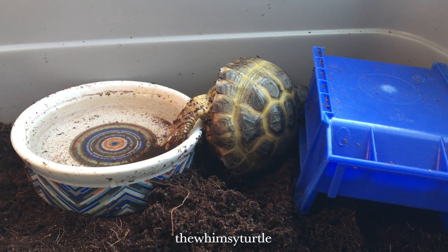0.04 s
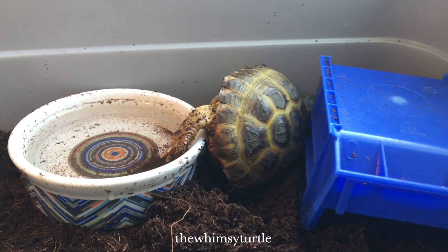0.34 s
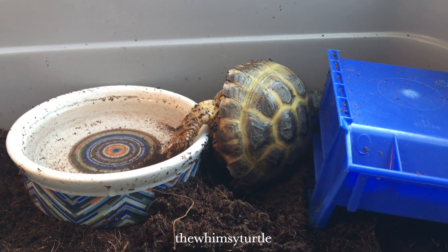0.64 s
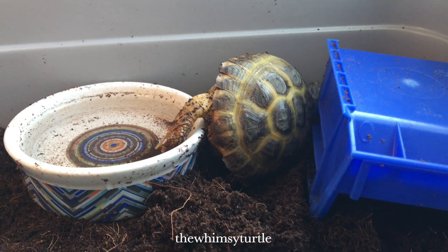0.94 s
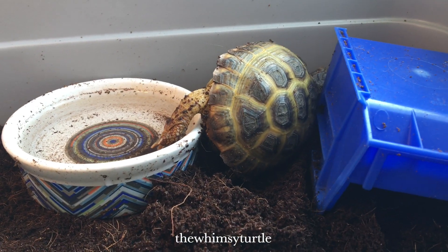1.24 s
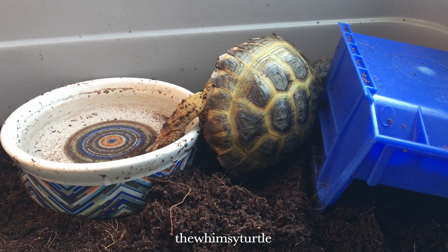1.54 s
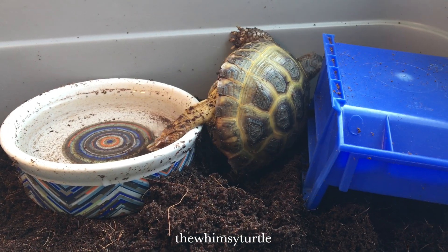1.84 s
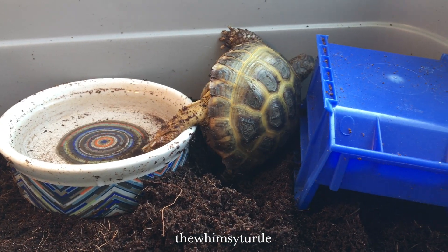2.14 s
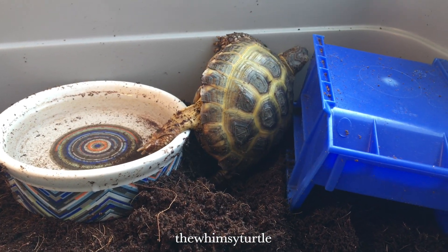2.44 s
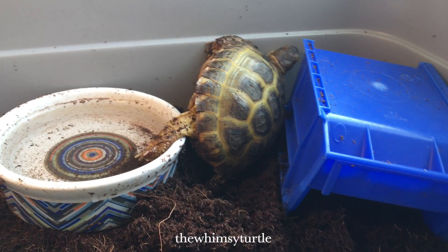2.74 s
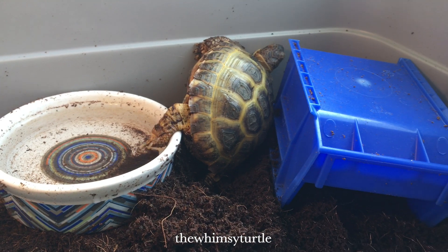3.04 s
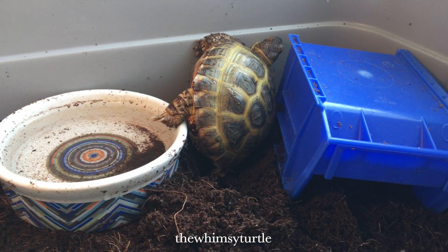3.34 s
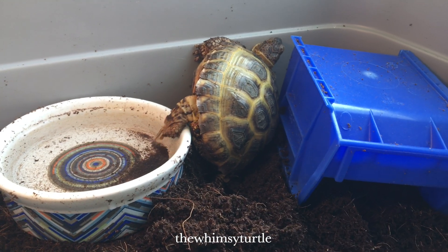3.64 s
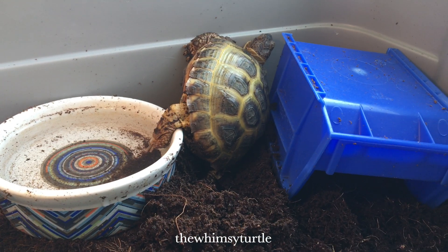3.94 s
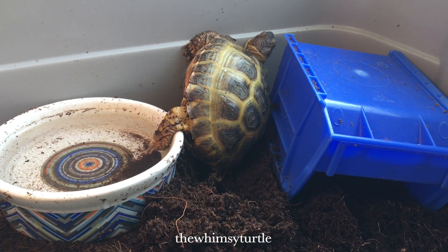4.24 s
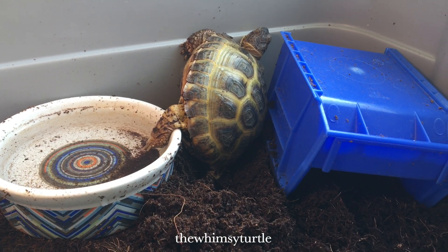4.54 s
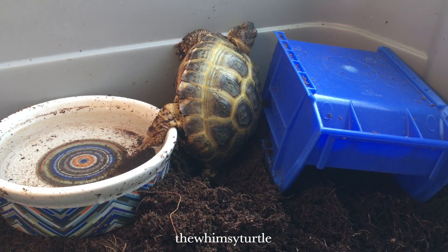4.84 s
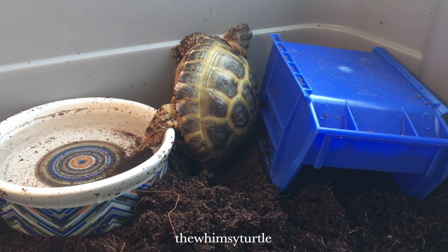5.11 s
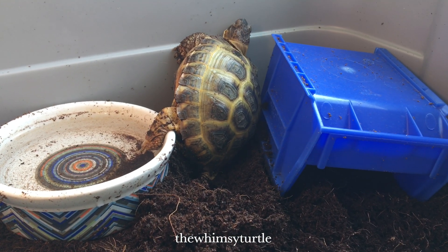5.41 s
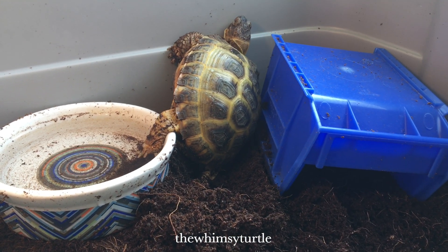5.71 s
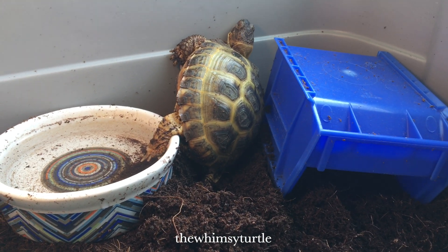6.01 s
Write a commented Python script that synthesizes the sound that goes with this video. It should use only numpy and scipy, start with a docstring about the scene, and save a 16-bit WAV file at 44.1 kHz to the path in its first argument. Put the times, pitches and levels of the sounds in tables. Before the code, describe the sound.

Close up, over faint indoor hum and hiss, soft claw scratches and gritty ticks come from a tortoise in a soil-filled plastic tub. Early on it slips, and the tub gives one loud, clattering thump. The animal keeps pushing in uneven bursts, its shell sticking and sliding so the plastic creaks and groans between light bumps. Near the end the rubbing grows stronger, with several hollow knocks close together.

```python
"""In a quiet room, a tortoise climbs the wall of a plastic tub, wedged between a bowl and a plastic hide.
An appliance hums faintly. Dry soil rustles and ticks under the feet, and the claws scratch and tap.
The shell sticks and slips along the plastic, which makes the tub judder and groan.
Once the tortoise slips and drops against the tub, which booms."""
import sys
import numpy as np
from scipy import signal
from scipy.fft import rfft, irfft
from scipy.io import wavfile
from scipy.ndimage import uniform_filter1d

SR = 44100
rng = np.random.default_rng(int(sys.argv[2]) if len(sys.argv) > 2 else 0)


def store_wav(level_fs):
    """Save 16-bit WAV to argv[1]."""
    pcm = np.round(np.clip(np.atleast_2d(level_fs), -1, 1) * 32767)
    wavfile.write(sys.argv[1], SR, pcm.T.astype(np.int16))


N = 267687
TIME = np.arange(N) / SR


def amp(db):
    """Turns decibels into a number to multiply by."""
    return 10 ** (np.asarray(db) / 20)


def unit(x):
    """Makes the average strength (rms) 1."""
    return x / np.sqrt(np.mean(x ** 2) + 1e-20)


def peaked(x):
    """Makes the highest peak 1."""
    return x / (abs(x).max() + 1e-20)


def steady(x, size=2600):
    """Evens out the loudness over about `size` samples but keeps the fine grain."""
    power = uniform_filter1d(uniform_filter1d(x ** 2, size), size)
    return x / np.sqrt(abs(power) + 1e-20)


def look_up(points, hz):
    """Reads between the rows of a table of frequencies."""
    f, value = np.transpose(points)
    return np.interp(np.log(hz + 1), np.log(f + 1), value)


def colour(x, points):
    """Sets the bass and treble from a table; sound below its first row fades away."""
    hz = np.fft.rfftfreq(2 * N, 1 / SR)
    bass_fade = np.minimum(hz / points[0][0], 1) ** 2
    return irfft(rfft(x, 2 * N) * amp(look_up(points, hz)) * bass_fade)[:N]


def keep(x, hz, side, order=2):
    """Keeps the "low" or "high" side of hz; a higher order cuts more sharply."""
    return signal.sosfilt(signal.butter(order, hz, side, fs=SR, output="sos"), x)


def add(mix, s, sound):
    """Mixes a sound in at s seconds."""
    part = mix[max(round(s * SR), 0):][:len(sound)]
    part += sound[:len(part)]


def grains(per_s, spread_db):
    """Tiny random hits, most small and a few large."""
    chance, size, sign = rng.random(N), rng.exponential(1, N), rng.choice([-1, 1], N)
    return (chance < per_s / SR) * sign * amp(spread_db * np.minimum(size, 4))


def clumps(depth_db, hz):
    """A sliding foot grips unevenly, so the loudness wanders."""
    return amp(depth_db * unit(keep(rng.standard_normal(N), hz, "low")))


def loudness(moves, start_db, end_db, grip_s, release_s, columns=(3,), power=1, lag=0):
    """Each move grips, swells to the sum of its dB columns, eases and lets go."""
    gain = np.zeros(N)
    for row in moves:
        s, swell, ease = row[:3]
        top = s + swell + lag * ease
        end = s + swell + ease
        on = slice(*np.searchsorted(TIME, [s - grip_s, end + release_s]))
        t = TIME[on]
        pressure_db = np.interp(t, [s, top, end], [start_db, 0, end_db])
        contact = np.clip(np.minimum((t - s) / grip_s, (end - t) / release_s) + 1, 0, 1)
        top_db = sum(row[k] for k in columns)
        gain[on] = np.maximum(gain[on], contact ** 2 * amp(top_db + power * pressure_db))
    return gain


# The tones of an appliance: f/Hz, level/dB
HUM_TONES = [(59.2, -59.5), (118.4, -62.5), (236.9, -69.5)]
# The room's rumble and hiss: f/Hz, relative level/dB
AIR_COLOUR = [(32, -7), (45, -8), (70, -2.5), (95, -3.5), (145, -10.5), (260, -12), (420, -22.5),
              (700, -26), (1200, -32), (2400, -37.5), (4200, -41), (5000, -43.5), (9000, -45.5),
              (10400, -48), (15800, -49.5)]


def room_tone():
    """Soft rumble and hiss, with an appliance's slightly wavering hum."""
    drift = unit(keep(rng.standard_normal(N), 0.93, "low"))
    hum = sum(amp(db) * unit(np.sin(2 * np.pi * (hz * TIME + rng.random()) + 0.14 * drift))
              for hz, db in HUM_TONES)
    return hum + amp(-56.5) * unit(colour(rng.standard_normal(N), AIR_COLOUR))


# How long the room echoes: f/Hz, time to fade by 60 dB/s
ECHO_TIMES = [(100, 0.45), (600, 0.33), (3000, 0.3), (12000, 0.42)]


def room_echo(x):
    """The walls send the sound back as a short, blurred echo."""
    hz, t, spectrum = signal.stft(rng.standard_normal(SR // 2), SR, nperseg=256)
    fade = amp(-60 * t / look_up(ECHO_TIMES, hz)[:, None])
    tail = signal.istft(spectrum * fade, SR, nperseg=256)[1]
    tail = np.concatenate([np.zeros(SR // 250), tail])  # arrives 4 ms late
    return signal.fftconvolve(x, tail / np.linalg.norm(tail))[:N]


# The notes the soil-filled tub rings at: f/Hz, relative level/dB, time to fade by 60 dB/s
TUB_NOTES = [(63.5, -8, 0.46), (159, -6, 0.14), (219, -1, 0.11), (253, -3, 0.075), (308.9, 0.5, 0.11),
             (356, -5, 0.16), (406.4, -5.5, 0.082), (453, -5.5, 0.047), (538.4, -3, 0.084),
             (580.7, -1.5, 0.069), (646.6, -7, 0.056), (737, -16.5, 0.063), (843, -16.5, 0.078),
             (903.4, -15, 0.11), (989, -5.5, 0.036), (1099, -7.5, 0.03), (1320, -26, 0.019),
             (1670, -10.5, 0.013), (1880, -15, 0.022), (2197, -13.5, 0.029), (2463, -26.5, 0.023),
             (3230, -18.5, 0.035), (3640, -25.5, 0.041), (3770, -19.5, 0.031), (4490, -15.5, 0.018)]


def tub(force):
    """A push sets the plastic ringing; neighbouring notes swing in opposite directions."""
    t = TIME[:SR // 3]
    ring = sum((-1) ** k * amp(db - 60 * t / fade_s) * np.sin(2 * np.pi * hz * t)
               for k, (hz, db, fade_s) in enumerate(TUB_NOTES))
    return signal.fftconvolve(force, ring)[:len(force)]


# Foot slides: t/s, swell/s, ease/s, relative claw level/dB, relative soil level/dB
FOOT_SLIDES = [(.06, 0.13, .04, -70, -79.5), (.78, .07, .03, -72, -83), (.93, .12, 0.19, -57.5, -76),
               (1.28, 0.16, .04, -69, -79), (1.64, 0.059, .01, -73, -71),
               (1.705, 0.029, 0.062, -39.5, -54.5), (1.79, .01, 0.17, -75, -73),
               (2.125, 0.063, 0.027, -53, -74), (2.23, .06, .012, -56.5, -80), (2.36, .01, 0.018, -63, -85),
               (2.6, 0.2, .11, -61.5, -77), (2.87, 0.11, 0.022, -60.5, -73), (3.02, .11, 0.19, -66, -81.5),
               (3.64, 0.14, 0.2, -61.5, -72), (3.99, 0.038, 0.16, -55.5, -69.5),
               (4.29, .025, 0.082, -65.5, -71), (4.4, .1, .05, -71, -72), (4.605, 0.019, 0.2, -63.5, -75),
               (4.7, .04, .11, -63.5, -71), (5.16, .03, 0.045, -72, -82), (5.36, 0.082, 0.11, -69, -79.5),
               (5.6, .1, 0.13, -58, -80), (5.82, .03, 0.22, -67, -86)]
CLAW_COLUMN, SOIL_COLUMN = 3, 4


def footwork(column):
    """How loud the claws or soil are as a foot slides on the wall and pushes soil aside."""
    return loudness(FOOT_SLIDES, start_db=-7, end_db=-12.5, grip_s=0.02, release_s=0.11, columns=[column])


# The bright sound of dry crumbs: f/Hz, relative level/dB
CRUMB_COLOUR = [(1500, -0.5), (3500, 7), (5000, 1), (6000, 7), (7800, -3), (9400, 2.5), (10400, -14),
                (12000, -2), (15800, -22)]


def soil_rustle():
    """A foot stirs the soil, and many tiny hits blur into a rustle."""
    crumbs = grains(per_s=1800, spread_db=0.5) * clumps(depth_db=2, hz=40)
    rustle = steady(colour(crumbs, CRUMB_COLOUR))
    return amp(3) * footwork(SOIL_COLUMN) * clumps(depth_db=2, hz=25) * rustle


# Snaps of dry grit: t/s, peak level/dB, f/Hz
GRIT_SNAPS = [(.2468, -50, 7900), (0.2466, -47.5, 2900), (.355, -58, 8500), (.4715, -58, 6460),
              (.574, -54, 9800), (0.7366, -43.5, 6400), (.818, -50, 8900), (1.278, -56, 11000),
              (1.704, -42, 11000), (1.737, -46, 10900), (1.781, -42, 9200), (1.794, -53, 12000),
              (1.837, -57, 12000), (2.966, -50, 10600), (2.976, -53, 9500), (4.7305, -52, 9900),
              (5.823, -59, 12500)]


def grit_ticks():
    """Single bits of grit snap, each a tiny burst of high noise."""
    out, t = np.zeros(N), TIME[:SR // 30]
    for s, db, hz in GRIT_SNAPS:
        snap = rng.standard_normal(len(t)) * (np.exp(-t / 0.001) + 0.18 * np.exp(-t / 0.0058))
        ring = signal.lfilter(*signal.iirpeak(hz, Q=2.2, fs=SR), snap)
        add(out, s, amp(db) * peaked(keep(ring, 0.52 * hz, "high")))
    return out


# The sound of claws on plastic: f/Hz, relative level/dB
CLAW_COLOUR = [(700, -5), (1200, -2), (1700, -2.5), (2200, -5), (2700, 1), (3500, -9), (4400, -11),
               (5000, -31), (7000, -23)]


def claw_scratches():
    """Sliding claws make many tiny catches, which also ring in the wall."""
    catches = grains(per_s=1800, spread_db=3) * clumps(depth_db=4, hz=45)
    ringing = unit(keep(tub(catches), 1290, "high", order=6))
    scratch = steady(colour(unit(catches) + ringing, CLAW_COLOUR))
    return amp(-3.5) * footwork(CLAW_COLUMN) * clumps(depth_db=2.5, hz=20) * scratch


# A claw or the shell's edge catches: t/s, length/s, relative level/dB, f/Hz
EDGE_CATCHES = [(.945, 0.11, -62, 1560), (1.03, 0.15, -67, 1053), (1.7, 0.022, -44, 1040),
                (1.708, 0.02, -47.5, 7430), (2.183, .02, -53.5, 1780), (2.237, 0.034, -56.5, 1755),
                (2.283, 0.019, -48.5, 1660), (2.361, 0.024, -52.5, 1700), (2.597, .032, -63.5, 1760),
                (2.74, 0.031, -59, 1870), (2.822, 0.076, -68.5, 3550), (2.957, 0.029, -67, 2970),
                (3.815, 0.093, -52.5, 1250), (4.036, .085, -66, 2120), (4.309, 0.016, -58.5, 2115),
                (4.604, 0.055, -63.5, 3520), (5.361, .09, -77, 2230), (5.652, 0.14, -60, 1723),
                (5.675, 0.12, -58, 1154), (5.695, .022, -52, 2150)]


def rasps():
    """A run of fast, uneven slips makes a short, rough tone."""
    out = np.zeros(N)
    for s, length, db, hz in EDGE_CATCHES:
        wobble, noise = rng.standard_normal((2, SR // 4))
        turns = np.cumsum(hz * (1 + 0.121 * unit(uniform_filter1d(wobble, 30)))) / SR
        rough = signal.lfilter(*signal.iirpeak(hz, Q=3, fs=SR), keep(noise, 0.23 * hz, "high"))
        rasp = (np.sin(2 * np.pi * turns) + 0.49 * unit(rough))[:int(length * SR)]
        add(out, s, amp(db - 4) * unit(rasp * signal.windows.tukey(len(rasp), 0.4)))
    return out


# The tortoise shifts its weight on the tub's floor: t/s, swell/s, ease/s, relative level/dB
WEIGHT_SHIFTS = [(.6, 0.25, 0.064, -47.5), (.9, .01, .035, -42), (2.96, .015, .02, -47),
                 (3.66, 0.39, .04, -52), (4.66, .015, .04, -47), (4.85, .14, .06, -51),
                 (5.34, .04, .04, -59), (5.85, .03, .19, -49)]
# The shell is shoved along the plastic: t/s, swell/s, ease/s, low groan level/dB,
# hollow middle level/dB and sharp bite level/dB (both compared with the groan)
SHELL_SHOVES = [(.72, .15, 0.033, -56.5, -14, -9), (.93, 0.04, 0.21, -55.5, -8.5, -4),
                (1.31, 0.053, 0.035, -61, 3.5, -4), (1.65, 0.06, 0.012, -49, 0, -3.5),
                (1.75, 0.03, 0.035, -37, 3, -4), (2.005, 0.0056, 0.048, -47.5, -14, -9.5),
                (2.125, 0.026, 0.062, -46, -1, -6), (2.23, 0.053, 0.11, -54, -4, -3),
                (2.42, .02, .03, -58, -3, -12), (2.69, 0.057, 0.25, -70, 3, -0.5),
                (2.885, 0.1, 0.053, -49, -7, -14), (3.115, 0.04, 0.16, -48.5, -9, -18),
                (3.37, 0.016, 0.046, -49, -5, -23), (3.645, 0.17, .105, -40.5, 4, -3.5),
                (3.93, 0.063, 0.13, -49.5, -6.5, -6.5), (4.26, 0.026, 0.38, -57, -4.5, -12),
                (4.657, 0.048, 0.18, -46, -0.5, -22), (4.87, 0.18, 0.028, -50, -4.5, -31),
                (5.34, .04, 0.19, -55.5, 1.5, -23), (5.54, 0.021, .02, -41.5, -9, -20),
                (5.585, .11, 0.083, -39.5, 4, -5), (5.79, 0.059, 0.045, -42.5, 6.5, -7.5),
                (5.91, 0.011, .25, -49, 3.5, -7)]


def shell_judder():
    """The shell sticks and slips, shaking the tub's low notes; sharper slips reach the higher ones."""
    slips = grains(per_s=380, spread_db=4) + amp(-21.5) * rng.standard_normal(N)
    wall = unit(tub(slips)) + 0.5 * unit(slips)
    rumble = steady(keep(keep(wall, 211, "low", order=7), 210, "high"))
    groan = steady(keep(keep(wall, 466.6, "low", order=5), 216.6, "high", order=4), size=1200)
    hollow = steady(keep(keep(wall, 364, "high", order=4), 762, "low", order=8), size=1000)
    bite = steady(keep(keep(wall, 722, "high", order=6), 1350, "low", order=4), size=1000)
    rumble *= loudness(WEIGHT_SHIFTS, start_db=-7, end_db=-9.5, grip_s=0.2, release_s=0.27)
    shove = dict(start_db=-5, end_db=-6, grip_s=0.0047, release_s=0.09)
    groan *= loudness(SHELL_SHOVES, **shove)
    # Higher notes grow faster than the pressure (power); the bite peaks as the shove eases (lag).
    hollow *= loudness(SHELL_SHOVES, **shove, columns=(3, 4), power=1.86)
    bite *= loudness(SHELL_SHOVES, **shove, columns=(3, 5), power=2.17, lag=0.28)
    return amp(-4.5) * rumble + amp(-0.03) * groan + amp(-3) * hollow + amp(0.7) * bite


# Shell and claws hit the tub: t/s, thud peak level/dB, f/Hz, crack peak level/dB
BLOWS = [(.184, -55.5, 596, -67), (0.8958, -30.5, 216, -53), (.976, -44, 427, -60),
         (1.347, -45.5, 335, -58), (1.433, -49, 540, -58), (1.512, -45, 250, -63), (1.646, -48, 483, -72),
         (1.686, -40, 420, -52), (1.718, -24, 168, -53), (1.7334, -13, 672, -27.5), (1.7395, -18, 355, -30),
         (1.7816, -25.5, 288, -23.5), (1.792, -28, 282, -52), (1.795, -30.5, 700, -40),
         (1.816, -29, 229, -55), (2.0, -36, 318, -40.5), (2.049, -39.5, 302, -63), (2.095, -42.5, 440, -68),
         (2.149, -44, 580, -62), (2.193, -35.5, 316, -52), (2.891, -49, 400, -52), (2.962, -42, 517, -51),
         (2.972, -33, 360, -48), (3.162, -42, 480, -64), (3.253, -42, 326, -67), (3.388, -50, 450, -60),
         (3.636, -40, 400, -62), (3.774, -29.5, 385, -64), (3.909, -33.5, 253, -60),
         (4.043, -47, 393, -44.5), (4.173, -40, 182, -62), (4.658, -34, 252, -57), (5.3118, -44, 500, -57),
         (5.335, -43, 104, -74), (5.465, -43, 128, -74), (5.5355, -32, 433, -64), (5.564, -30, 433, -68),
         (5.591, -33.5, 475, -64), (5.618, -30.5, 365, -62), (5.653, -27, 426, -60), (5.729, -28, 334, -68),
         (5.767, -39, 570, -68)]


def knocks(flex_s=0.002):
    """Each blow starts with a dry crack, bends the wall to and fro and sets the tub ringing."""
    out, t = np.zeros(N), TIME[:SR // 3]
    ring = tub(signal.unit_impulse(len(t)))
    tock = peaked(keep(keep(ring, 900, "high", order=5), 1500, "low"))  # the wall's short upper notes
    for s, thud_db, hz, crack_db in BLOWS:
        add(out, s, amp((thud_db + crack_db) / 2 - 8) * tock)
        cycles = hz * t
        turns = cycles + 0.73 * (1 - np.exp(-cycles / 0.21))  # a bending wall sends its treble first
        flex = peaked(cycles ** 2 * np.exp(-1.5 * t / flex_s) * np.sin(2 * np.pi * turns))
        add(out, s, amp(thud_db) * peaked(flex + 0.41 * peaked(tub(flex))))
        crack = rng.standard_normal(len(t)) * (np.exp(-t / 0.0022) + 0.057 * np.exp(-t / 0.007))
        add(out, s, amp(crack_db) * peaked(keep(keep(crack, 700, "high"), 3470, "low", order=3)))
    return out


def body_drop(land_s=1.739, peak_db=-17.5, push_s=0.0049, settle_s=0.11):
    """The falling body gives the floor one soft push; the tub booms until the weight hushes it."""
    out, t = np.zeros(N), TIME[:SR // 2]
    push = np.sin(np.pi * np.minimum(t / push_s, 1))
    boom = tub(push) / (1 + (t / settle_s) ** 6)
    add(out, land_s, amp(peak_db) * peaked(keep(boom, 52, "high", order=3)))
    return out


def scene():
    """The tortoise in its tub, with the room around it."""
    tortoise = shell_judder() + claw_scratches() + rasps() + knocks() + body_drop()
    tortoise += soil_rustle() + grit_ticks()
    return (tortoise + amp(-14) * room_echo(tortoise) + room_tone())[None]


def record(dry, top_hz=15800):
    """Cuts away the very highest treble."""
    treble_cut = signal.firwin(801, top_hz, window=("kaiser", 9), fs=SR)
    return signal.oaconvolve(dry, treble_cut[None], "same")


dry = scene()
out = record(dry)
store_wav(out)
```